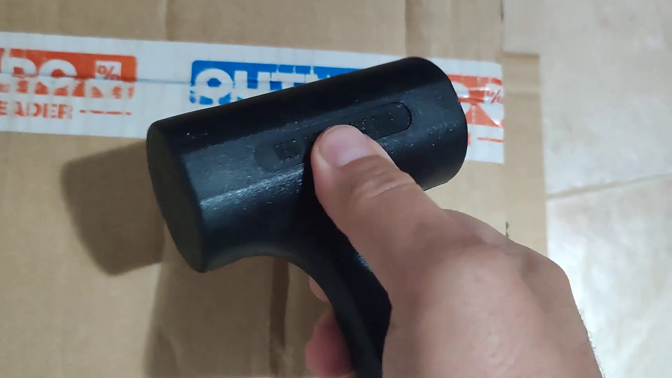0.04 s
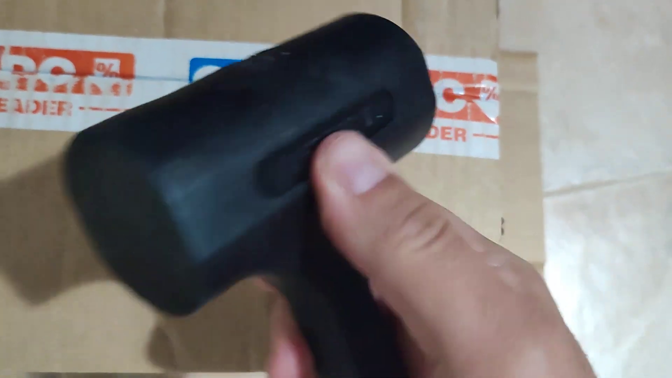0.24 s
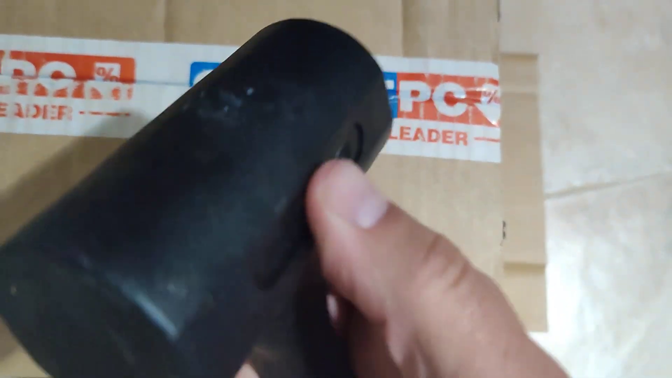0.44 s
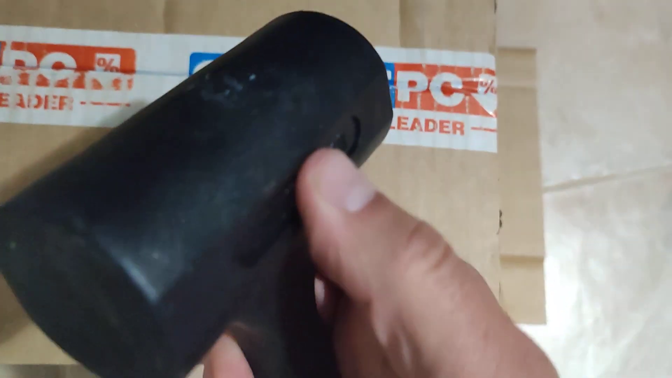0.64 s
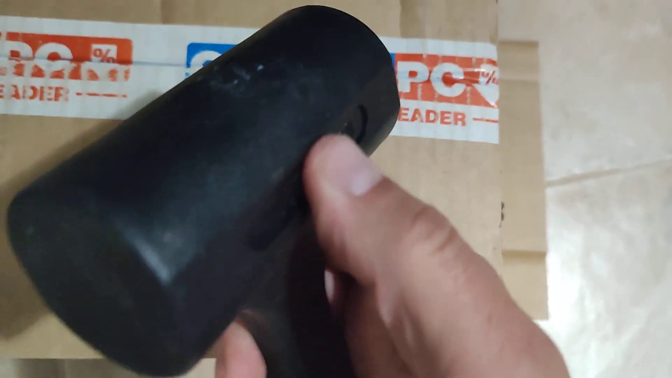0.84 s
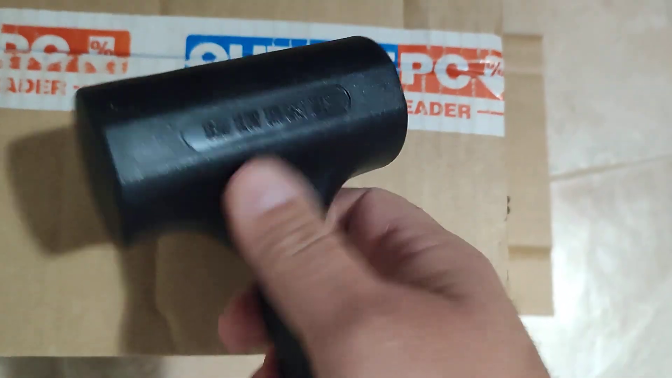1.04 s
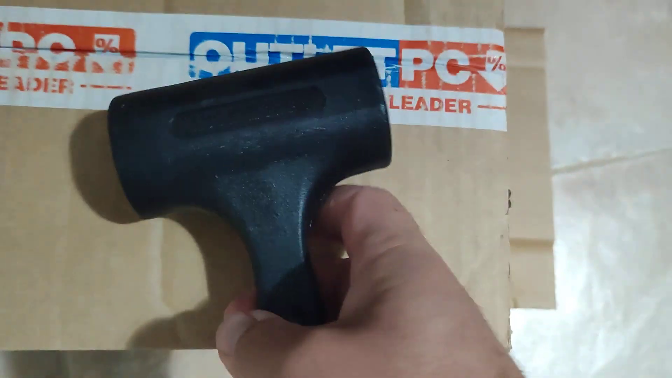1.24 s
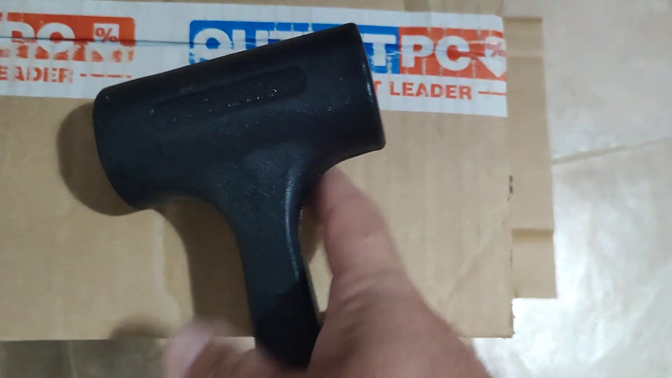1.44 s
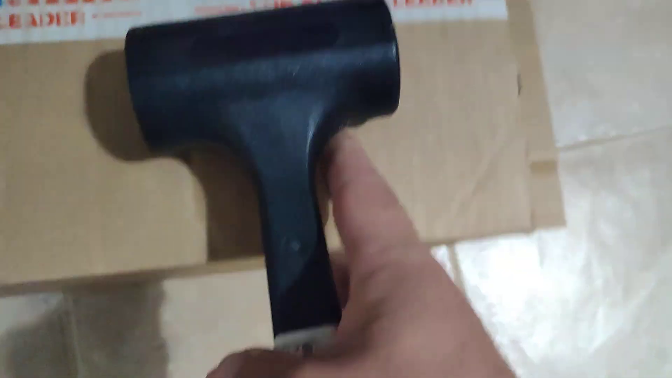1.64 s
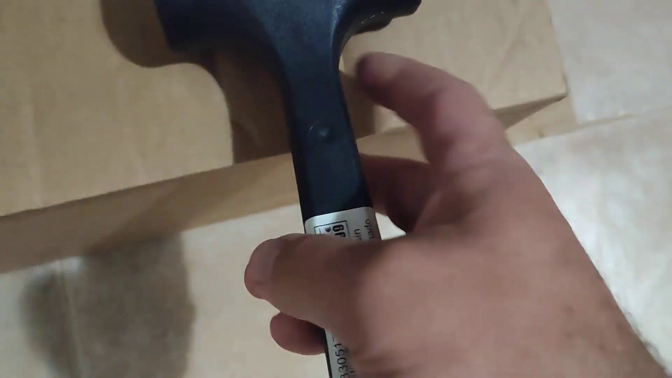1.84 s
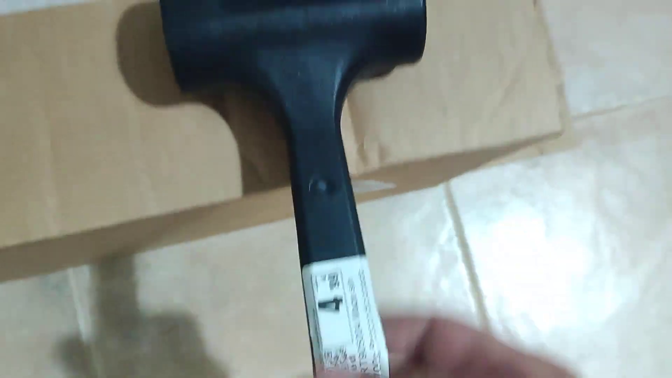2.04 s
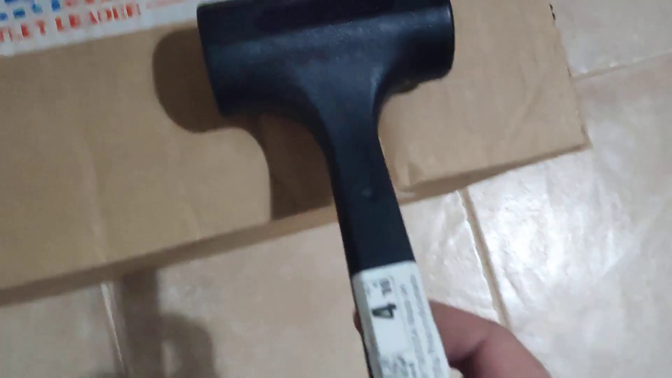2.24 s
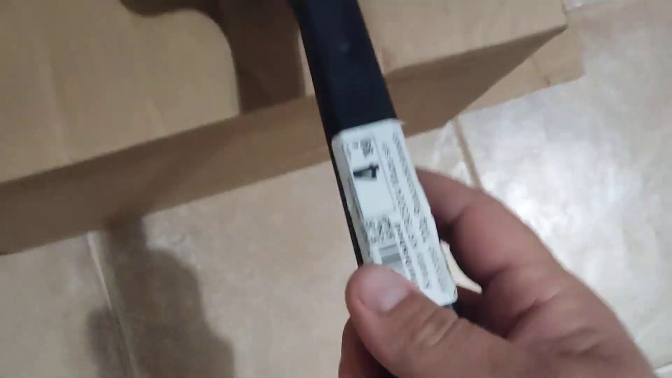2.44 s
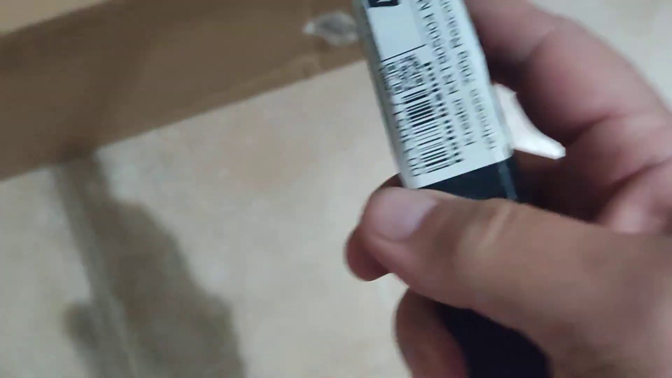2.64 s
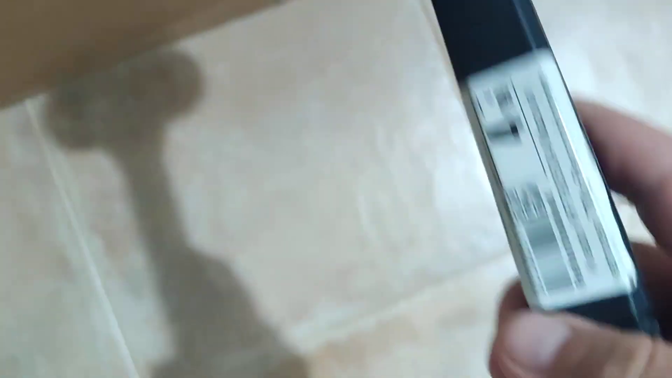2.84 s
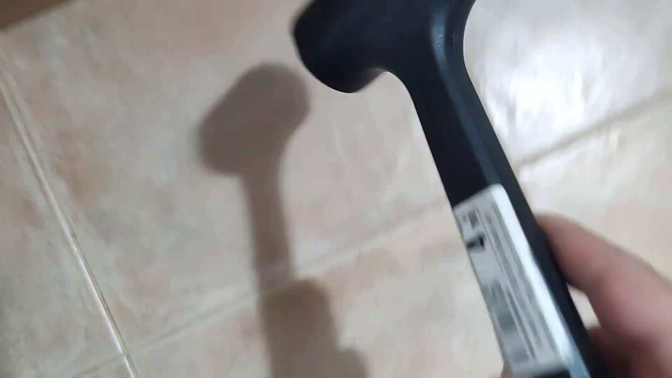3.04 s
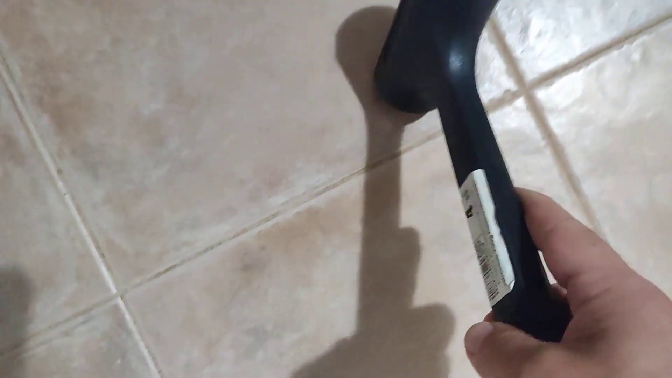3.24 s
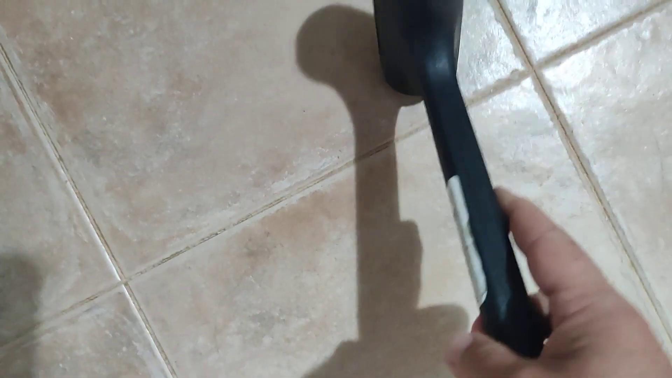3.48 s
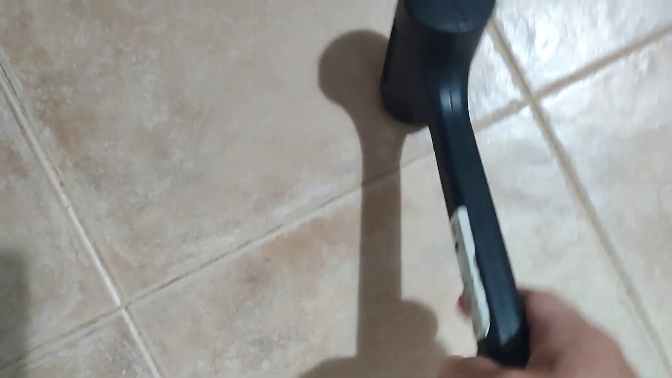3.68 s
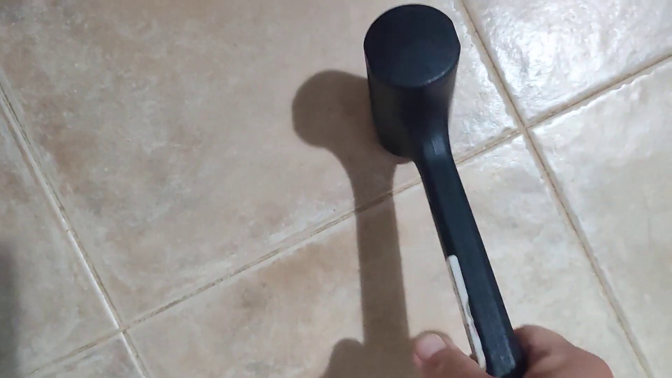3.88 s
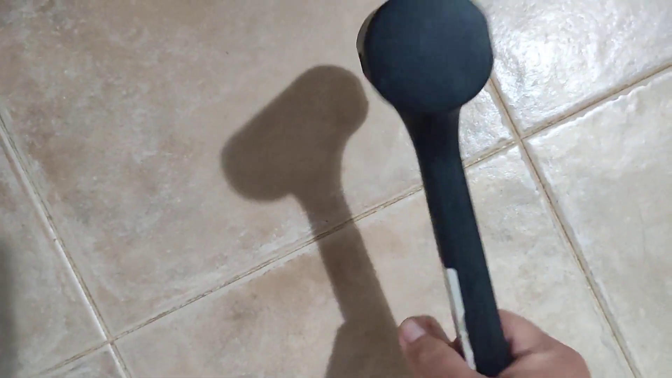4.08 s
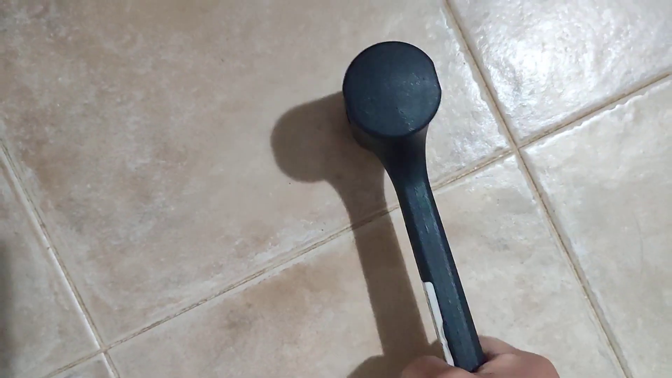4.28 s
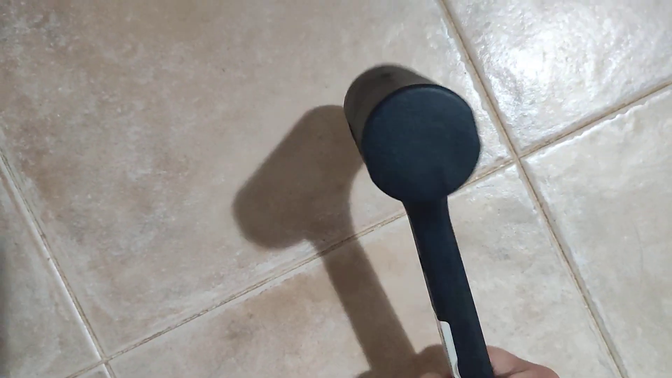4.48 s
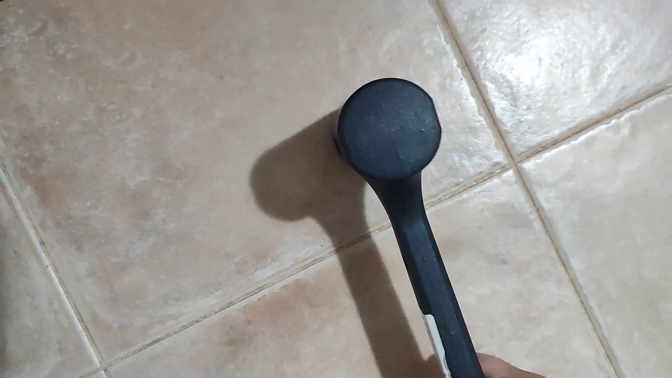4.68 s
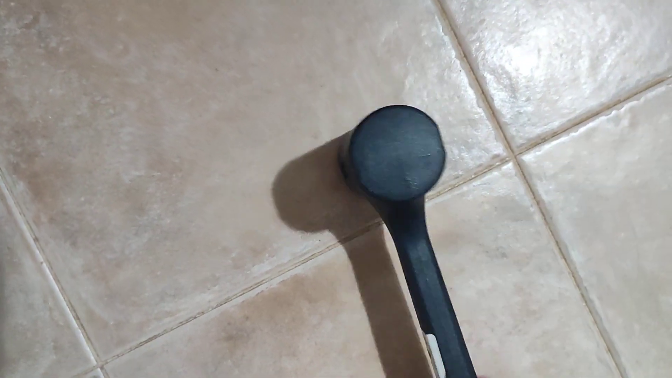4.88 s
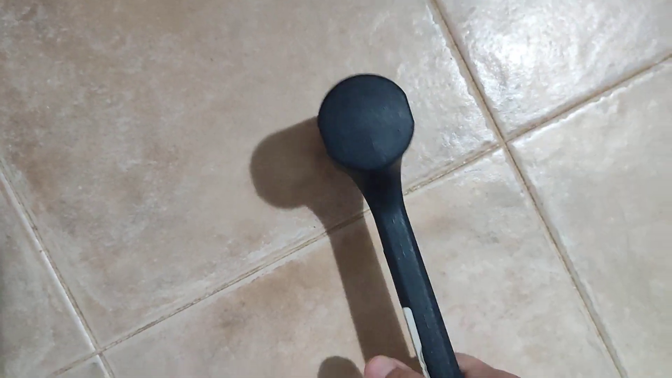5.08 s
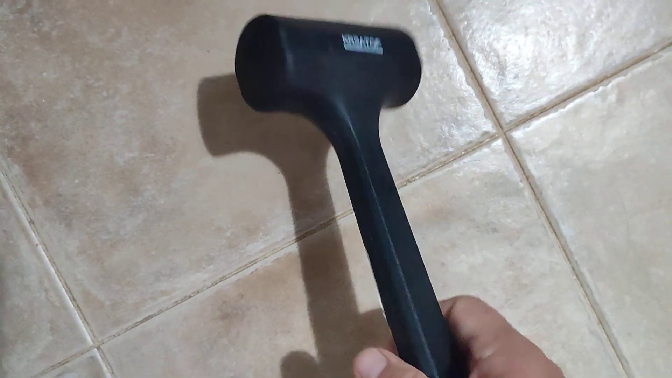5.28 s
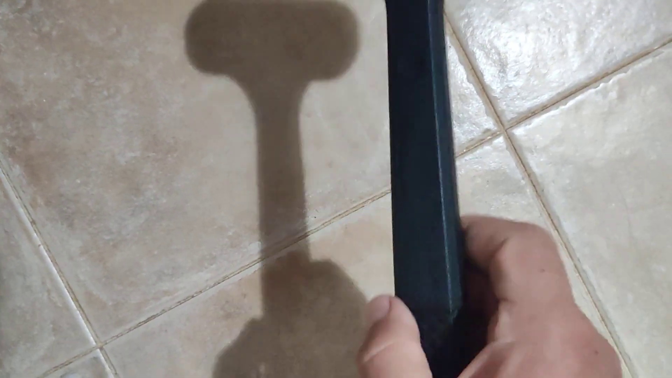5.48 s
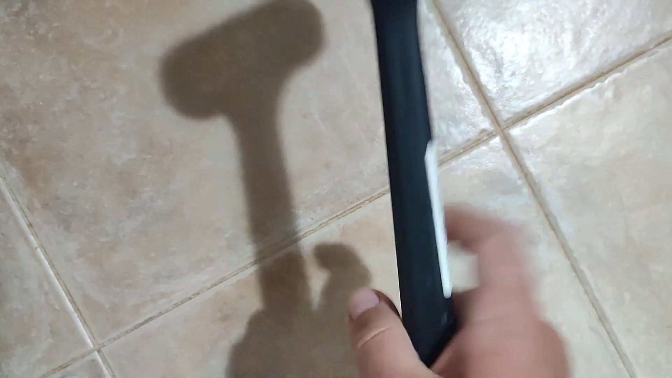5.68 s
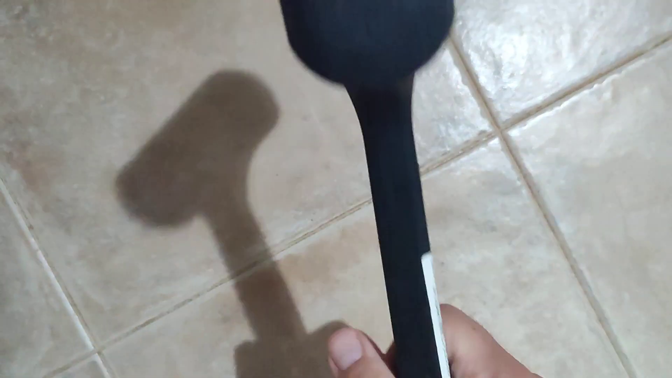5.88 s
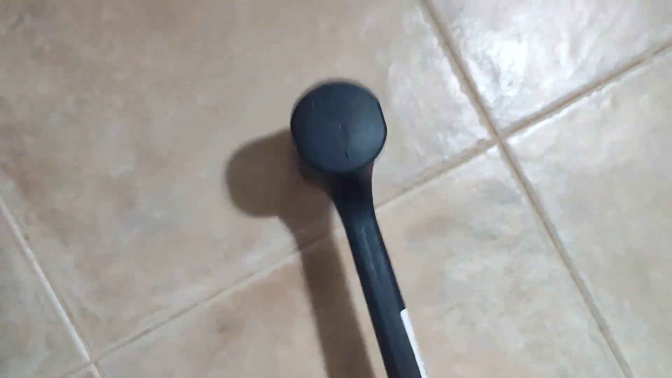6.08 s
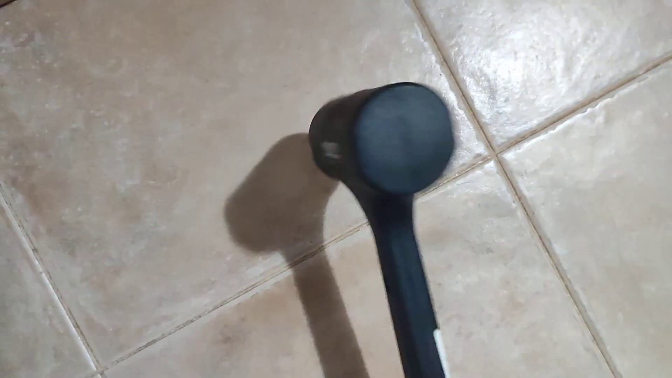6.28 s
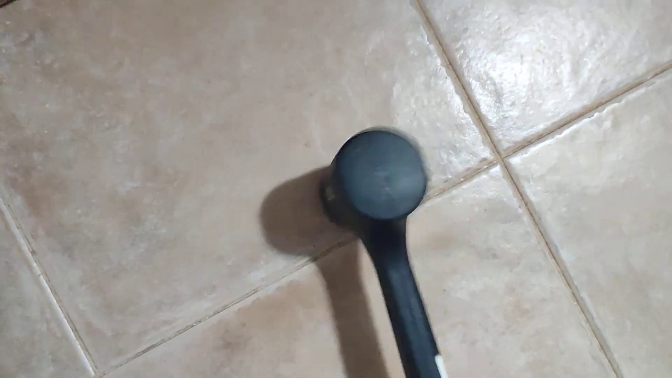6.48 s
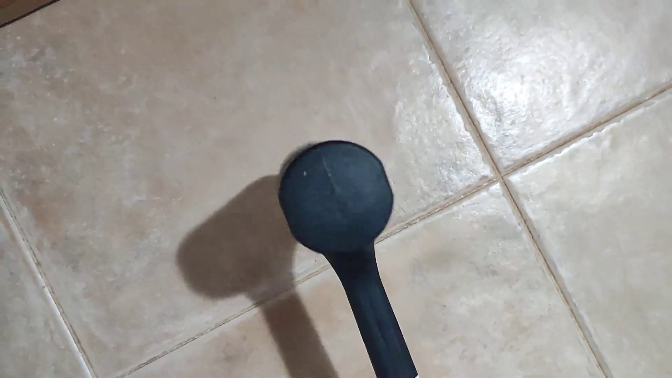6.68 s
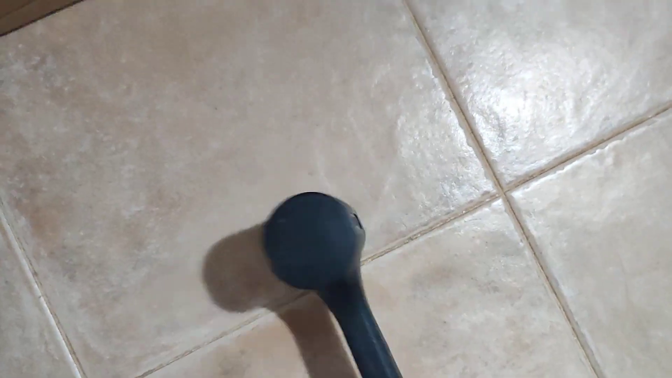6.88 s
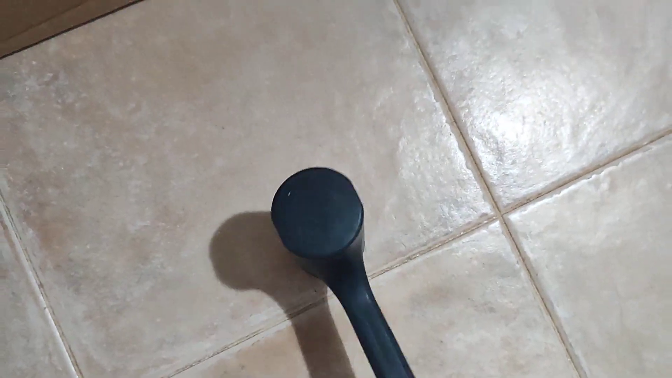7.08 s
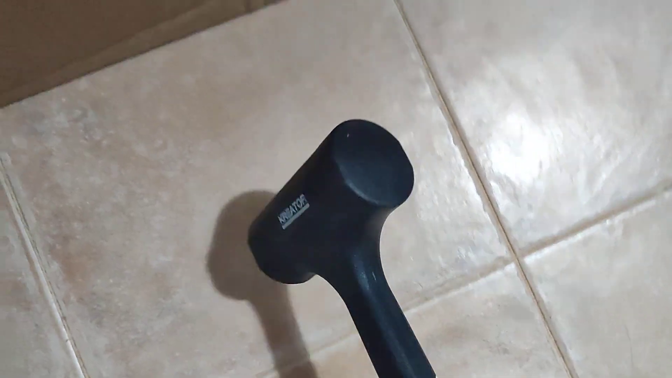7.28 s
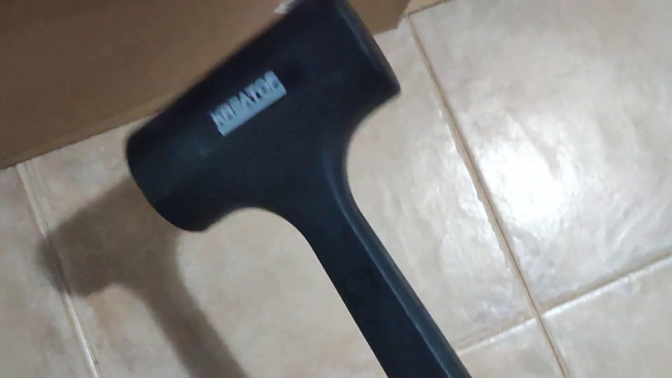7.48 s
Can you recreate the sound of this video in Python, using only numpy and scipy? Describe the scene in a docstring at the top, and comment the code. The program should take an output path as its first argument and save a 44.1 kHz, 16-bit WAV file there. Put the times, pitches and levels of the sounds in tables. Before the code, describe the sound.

Quiet, hollow bumps and a grainy scrape come from a mallet sliding over a cardboard box. It is set lightly on ceramic tile, then strikes three loud, sharp knocks, pauses, and strikes three more, with a short echo from a small room. The microphone is close, and its right side is muffled by a finger that creaks faintly before and after the knocks. A faint hush and a thin whine on the left continue throughout.

```python
"""A dead-blow rubber mallet bumps onto a hollow cardboard box and is dragged off it, rasping and hissing.
A soft sliding swish, likely a hand on the handle, follows; then the mallet is set down on a tiled floor.
Six knocks each ring the tile briefly and fill a small hard room; the head's loose fill swishes after some.
Before and after the knocks, a finger creaks on the right microphone of a phone close by, which it covers.
A faint hush lies under it all, with a thin electrical whine on the left."""
import sys
import numpy as np
from scipy import signal
from scipy.fft import rfft, irfft, next_fast_len
from scipy.io import wavfile
from scipy.ndimage import uniform_filter1d

SR = 44100
rng = np.random.default_rng(int(sys.argv[2]) if len(sys.argv) > 2 else 0)


def unload_audio(sound):
    """Save the sound as a 16-bit wav file, at the path given as the first command line argument."""
    columns = np.transpose(np.atleast_2d(sound))
    # keep every value between -1 and 1, then stretch to whole-number steps
    steps = np.round(np.clip(columns, -1, 1) * 32767)
    wavfile.write(sys.argv[1], SR, steps.astype(np.int16))


N = 331632
RING_SAMPLES = 32768  # length of one hit and its tail
TIME_S, AGE_S = np.arange(N) / SR, np.arange(RING_SAMPLES) / SR


# Two soft touches, then six knocks: start_s, level_db, tilt (0 flat face, 1 rim), clack_db, right_db
BLOWS = [(3.3514, -29.5, 0.21, 0.5, 4), (3.3803, -43, 0.22, 0, -1), (4.2862, 1, 0.21, -4.5, 0.5),
         (4.646, -1.4, 1, -1, 1.5), (4.9618, -1.8, 1, -2.5, 4.5), (6.1855, 1, 0.82, 7, 5),
         (6.5857, .5, 0.63, 2, 2), (6.9707, 1.5, 0.021, -2.5, 1)]
# Notes of the tile and mallet head: pitch_hz, level_db, ring_s (time to fade by 60 dB)
TILE_NOTES = [(264.8, 0, 0.032), (351, -5.5, 0.021), (533.6, -9, 0.015), (646, -6.5, 0.018),
              (910, -11.5, 0.015), (1083, -6, 0.016), (1214, -10, 0.016), (1706, -15.5, 0.023),
              (2570, -17.5, 0.012), (2570, -21.5, 0.014), (3570, -33, 0.0059), (5280, -18, 0.0066),
              (7180, -13, 0.0077)]
# Tone of the crack as they meet: pitch_hz, level_db
CRACK_TONE = [(800, -58), (2000, -46.5), (3800, -51), (5500, -50), (7000, -47), (8300, -48), (9700, -106),
              (12000, -57), (15000, -79.5)]
# The room's echo: pitch_hz, level_db, ring_s
ROOM_ECHO = [(82, -68.5, 1), (133.7, -70, 0.58), (194, -51.5, 0.46), (450, -58, 0.39), (860, -60, 0.47),
             (1434, -56.5, 0.37), (2056, -61.5, 0.45), (3730, -72, 0.45), (5670, -72, 0.38),
             (8220, -69, 0.34), (9570, -77.5, 0.11), (14000, -87.5, 0.37)]
# Notes that ring between the walls: pitch_hz, level_db, ring_s
ROOM_NOTES = [(253.6, -28.5, 0.28), (375, -45, 0.58), (440.5, -39.5, 0.44), (498, -47.5, 0.65),
              (570, -54.5, 0.45), (719, -38.5, 0.46), (825, -47, 0.53)]
# How the part that lands shapes the tone: pitch_hz, flat_face_db, rim_db
CONTACT_TONE = [(260, 0.1, -5), (550, 6, 6.5), (1000, -3.9, 4.5), (2200, -7.5, -8), (7500, -19, 2),
                (11100, -13.5, 0.5)]
def knocks(crack_s=0.012, press_s=0.00266, thud_hz=260, clack_hz=2200):
    """The mallet rings the tile and the room answers; its flat face thuds, its rim cracks."""
    out = np.zeros((2, N))
    pitch_hz, flat_db, rim_db = np.transpose(CONTACT_TONE)
    thud_band = np.maximum(1 - np.abs(np.log2(pitch_hz / thud_hz)), 0)
    clack_band = np.maximum(1 - np.abs(np.log2(pitch_hz / clack_hz)), 0)
    for start_s, level_db, tilt, clack_db, right_db in BLOWS:
        crack = shape(stereo_noise(RING_SAMPLES, alike_hz=900)[0] * fade(crack_s), CRACK_TONE)
        landing = ring(TILE_NOTES, swell_s=0.0065, detune=0.0023) + crack
        # The rubber presses, then lets go: the same ring, later, duller and upside down.
        delayed = np.interp(AGE_S - press_s, AGE_S, landing, left=0)
        release = shape(delayed, [(1500, -1), (4000, -11.5)])
        direct = shape(landing - release, [(110, -12), (200, 0)])  # a tile is too small for deep bass
        shaded = shape(direct, [(260, 0.059), (1000, -4)])  # the right microphone faces away
        room = dying_noise(ROOM_ECHO, build_s=0.001) + ring(ROOM_NOTES, swell_s=0.0089, detune=0.0022)
        thud_db = -(0.59 * level_db + 0.45 * clack_db)  # gentler, less clacky blows lean toward thud
        tone_db = flat_db + tilt * (rim_db - flat_db) + clack_db * clack_band + thud_db * thud_band
        blow = shape(np.array([direct, shaded]) + room, np.transpose([pitch_hz, tone_db]))
        add(out, start_s, blow * gain([[level_db], [level_db + right_db]]))
    return out


# The head hitting the box: start_s, level_db, slap_db
BOX_HITS = [(1.235, -27.5, -15), (1.2884, -37, 5), (1.551, -39.5, -15.5), (1.707, -35, -23),
            (1.864, -35, -10), (1.984, -47.5, -5), (2.229, -50.5, 3.5), (2.467, -57, 4.5),
            (2.532, -44, -28)]
# Notes of the hollow box, also stirred by the drag: pitch_hz, level_db, ring_s
BOX_NOTES = [(80, -12.5, 0.2), (127, -29, 0.11), (211, -7.5, 0.074), (281.2, -4.5, 0.095),
             (327.4, -9.5, 0.19), (510, -18, 0.066), (845, -7.5, 0.03), (1113, -19.5, 0.24)]
# The slap of cardboard: pitch_hz, level_db, ring_s
SLAP_NOISE = [(204, -22, 0.28), (1010, -38, 0.22), (2500, -42, 0.22), (5000, -48, 0.21),
              (8200, -45.5, 0.22), (9700, -66, 0.17), (14000, -62, 0.13)]
def box_bumps(edge_db=-3, face_delay_s=0.0072, cardboard_db=-5.5, tick_db=12, tick_s=0.0099):
    """The head drops on the box and jolts over it, landing edge first and then face."""
    out = np.zeros((2, N))
    for start_s, level_db, slap_db in BOX_HITS:
        for delay_s, touch_db in ((0, edge_db), (face_delay_s, 0)):
            slap = dying_noise(SLAP_NOISE, build_s=0.00028) * (1 + gain(tick_db) * fade(tick_s))
            boom = ring(BOX_NOTES, swell_s=0.002, detune=0.0336)
            bump = boom + gain(slap_db + cardboard_db) * slap
            add(out, start_s + delay_s, gain(level_db + touch_db) * bump)
    return out


# Tone of rubbing: pitch_hz, level_db
RUB_TONE = [(150, -6.5), (450, -2.5), (750, -5), (1200, 1), (1500, -3.5), (2000, -1), (3500, -3.5),
            (5500, -7.5), (7300, -3.5), (8400, -4.5), (9600, -24.5), (12000, -17), (14500, -22.5)]
def rubbing(spread_db):
    """Many tiny slips of uneven size blur into a grainy hiss."""
    slip_db = spread_db * np.repeat(rng.standard_normal(N // 64 + 1), 64)[:N]
    return normalize(shape(stereo_noise(N, alike_hz=900) * gain(slip_db), RUB_TONE))


# How fast the head slides, given as a rubbing level: time_s, level_db
DRAG_SPEED = [(1.34, -61), (1.356, -64.5), (1.414, -57.5), (1.462, -67), (1.652, -60.5), (1.692, -55),
              (1.814, -52.5), (1.974, -66), (2.074, -57), (2.134, -59), (2.284, -51), (2.382, -63),
              (2.492, -59.5), (2.504, -71), (2.56, -76)]
def box_drag(brisk_db=-53, fade_s=0.041, lift_at_s=1.9, lift_takes_s=0.052, lift_db=-7):
    """Rubber slips over cardboard: it rasps, hisses when fast and keeps the box droning."""
    time_s, level_db = np.transpose(DRAG_SPEED)
    speed_db = np.interp(TIME_S, time_s, level_db) - brisk_db
    touching = np.clip(np.minimum(TIME_S - time_s[0], time_s[-1] - TIME_S) / fade_s + 1, 0, 1)
    # The hand takes most of the weight off the box, so the drone drops.
    weight_db = lift_db * np.clip((TIME_S - lift_at_s) / lift_takes_s + 0.5, 0, 1)
    rasp = normalize(shape(rubbing(spread_db=3.5), [(4500, -17), (7000, -20.5)]))
    hiss = normalize(shape(rubbing(spread_db=2), [(4000, -21.5), (6500, -16), (12000, -13)]))
    drone = normalize(signal.fftconvolve(rng.standard_normal(N), ring(BOX_NOTES))[:N])
    return touching * (gain(-50 + 0.85 * speed_db) * rasp
                       + gain(-47 + 1.27 * speed_db) * hiss
                       + gain(-49 + 0.18 * speed_db + weight_db) * drone)


# One swish after the drag, the rest after knocks: peak_s, width_s, level_db
SOFT_SWISHES = [(2.82, 0.12, -59), (5.061, 0.033, -59), (5.115, 0.02, -58), (6.285, 0.05, -53),
                (6.496, 0.021, -57), (7.226, 0.019, -58)]
def swishes():
    """Soft sliding: first likely a hand on the handle, later the loose fill shifting in the head."""
    slide = shape(rubbing(spread_db=2), [(700, -4.5), (1800, 6.5), (8000, 3.5), (11000, 0.5)])
    return slide * sum(gain(level_db) * np.exp(-((TIME_S - peak_s) / width_s) ** 2)
                       for peak_s, width_s, level_db in SOFT_SWISHES)


# Slips of the finger: start_s, level_db
FINGER_SLIPS = [(3.746, -53), (3.891, -48.5), (3.929, -48.5), (3.999, -52.5), (4.0341, -47.5),
                (4.0885, -51.5), (7.391, -47.5), (7.4302, -48.5)]
# Notes of the skin over the microphone: pitch_hz, level_db, ring_s
SKIN_NOTES = [(298, 5.5, 0.0073), (716, 10.5, 0.0047), (1200, 7, 0.0041)]
def finger_creaks(typical_gap_s=0.00505, stutter_db=-7.5):
    """Skin slips on the microphone and a weaker slip follows; the fingertip muffles both."""
    out = np.zeros(N)
    gaps_s = typical_gap_s * (rng.random(len(FINGER_SLIPS)) + 0.5)
    for (start_s, level_db), gap_s in zip(FINGER_SLIPS, gaps_s):
        add(out, start_s, gain(level_db) * ring(SKIN_NOTES, detune=0.061))
        add(out, start_s + gap_s, gain(level_db + stutter_db) * ring(SKIN_NOTES, detune=0.08))
    return shape(out, [(800, 2.5), (1500, 0), (3000, -11), (6000, -30)])


# What gets past the finger: pitch_hz, level_db
FINGER_TONE = [(90, -7), (260, -6.5), (550, -10.5), (1000, -13), (2000, -16.5), (4000, -19), (7500, -40),
               (12000, -22.5)]
def through_finger(sound):
    """A finger over the microphone makes the sound quieter and duller."""
    return shape(sound, FINGER_TONE)


# Tones of the whine: pitch_hz, level_db (before the boost)
WHINE_TONES = [(3198, -85.5), (3601, -86.5), (4748, -89.5), (6196, -92), (6395, -91.5), (6600, -80.5),
               (6799, -92), (6998, -88.5), (7197, -70), (7795, -82), (8199, -86)]
def electrical_whine(boost_db=5, waver_hz=9, flutter_db=2.73):
    """Thin electrical tones waver together in pitch and loudness."""
    waver, flutter = (normalize(uniform_filter1d(uniform_filter1d(noise, size=700), size=700))
                      for noise in rng.standard_normal((2, N)))
    loudest_hz = max(WHINE_TONES, key=lambda tone: tone[1])[0]  # this tone strays by about waver_hz
    clock_s = TIME_S + np.cumsum(waver) * waver_hz / loudest_hz / SR
    tones = sum(gain(db) * np.sin(2 * np.pi * hz * clock_s) for hz, db in WHINE_TONES)
    return np.sqrt(2) * gain(boost_db + flutter_db * flutter) * tones


# Tone of the background at each microphone: pitch_hz, level_db
LEFT_HUSH = [(25, -80), (55, -80.5), (95, -79.5), (140, -86), (300, -92), (560, -101), (780, -93.5),
             (1200, -107), (3400, -107), (5500, -111), (7300, -105), (8300, -112), (9600, -124),
             (14000, -118)]
RIGHT_HUSH = [(25, -72), (55, -87), (95, -79), (140, -89.5), (300, -99), (780, -107), (1200, -112),
              (3000, -114), (5000, -119), (8500, -128), (14000, -117)]
def hush():
    """Faint, steady noise, strongest in the bass."""
    left, right = stereo_noise(N, alike_hz=235)
    return shape(left, LEFT_HUSH), shape(right, RIGHT_HUSH)


def gain(db):
    """Turn decibels into a multiplier."""
    return 10 ** (np.asarray(db) / 20)


def normalize(sound):
    """Scale a sound to an average power of 1."""
    return sound / np.sqrt(np.mean(sound ** 2))


def fade(ring_s):
    """A curve that falls by 60 dB in ring_s."""
    return np.exp(-np.log(1000) * AGE_S / max(ring_s, 1e-4))


def add(out, start_s, sound):
    """Mix a sound into out, beginning at start_s."""
    first = int(round(start_s * SR))
    out[..., first:first + sound.shape[-1]] += sound[..., :N - first]


def pitch_curve(n, pitch_hz, values):
    """Join values along a scale of octaves, for the spectrum of n samples."""
    return np.interp(np.log(np.arange(n // 2 + 1) * SR / n + 0.0017), np.log(pitch_hz), values)


def shape(sound, tone):
    """Turn lows and highs up or down along (pitch_hz, level_db) points."""
    n = 2 * next_fast_len(sound.shape[-1] // 2 + 1024)
    cepstrum = irfft(np.log(gain(pitch_curve(n, *np.transpose(tone)))))
    # Folding this onto its first half keeps the filter from ringing before a hit.
    cepstrum[1:n // 2] *= 2
    cepstrum[n // 2 + 1:] = 0
    return irfft(rfft(sound, n) * np.exp(rfft(cepstrum)))[..., :sound.shape[-1]]


def stereo_noise(n, alike_hz):
    """White noise, alike on both sides below alike_hz and unrelated far above it."""
    left, other = rfft(rng.standard_normal((2, n)))
    alike = 1 / (1 + (np.arange(len(left)) * SR / n / alike_hz) ** 2)
    right = alike * left + np.sqrt(1 - alike ** 2) * other
    return irfft([left, right], n) * np.sqrt(SR / 2)


def ring(notes, swell_s=0., detune=0.):
    """Fading notes of a struck thing; the lowest builds over swell_s, higher ones sooner."""
    out = 0
    for pitch_hz, level_db, ring_s in notes:
        rise_s = swell_s * (notes[0][0] / pitch_hz) ** 2 + 1e-6
        swell = (1 - np.exp(-AGE_S / rise_s)) ** 2
        detuned_hz = pitch_hz * (1 + detune * rng.standard_normal())
        out = out + gain(level_db) * swell * fade(ring_s) * np.sin(2 * np.pi * detuned_hz * AGE_S)
    return out


def dying_noise(bands, build_s):
    """Crowded echoes: noise that builds up, then fades at each band's own rate."""
    n = RING_SAMPLES
    pitch_hz, level_db, ring_s = np.transpose(bands)
    spectrum = rfft(stereo_noise(n, alike_hz=920)) * gain(pitch_curve(n, pitch_hz, level_db))
    parts = (irfft(spectrum * pitch_curve(n, pitch_hz, band)) * fade(band_s)
             for band, band_s in zip(np.eye(len(pitch_hz)), ring_s))
    return sum(parts) * (1 - np.exp(-AGE_S / build_s))


def scene(right_lag_samples=11):
    """The mallet reaches the left microphone openly and the right one later, through the finger."""
    left, right = knocks() + box_bumps() + box_drag() + swishes()
    left_hush, right_hush = hush()
    left = left + left_hush + electrical_whine()
    right = through_finger(right) + right_hush + finger_creaks()
    return np.array([left, np.roll(right, right_lag_samples)])


def record(dry, ceiling=0.9, top_hz=14500):
    """The phone rounds off the tallest peaks and cuts the highest treble."""
    rounded = dry / (1 + (dry / ceiling) ** 4) ** 0.25
    return signal.sosfilt(signal.ellip(8, 0.2, 70, top_hz, fs=SR, output="sos"), rounded)


dry = scene()
out = record(dry)
unload_audio(out)
```